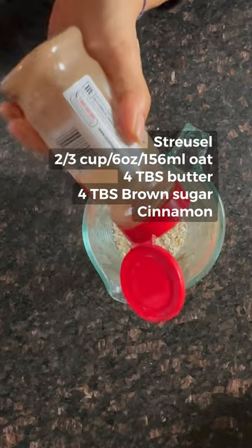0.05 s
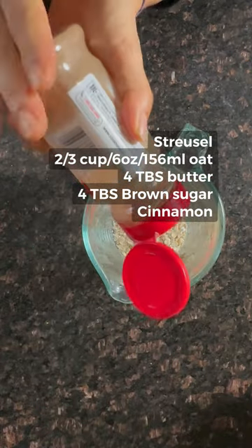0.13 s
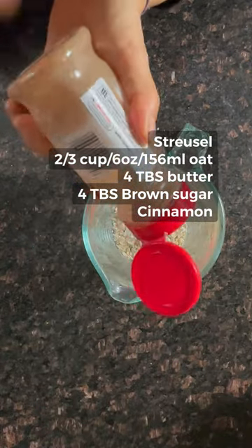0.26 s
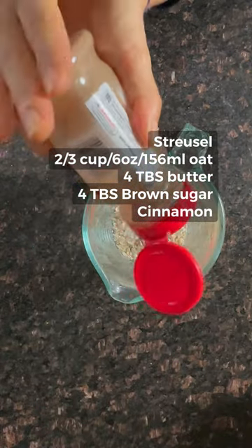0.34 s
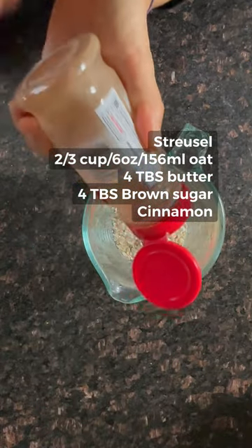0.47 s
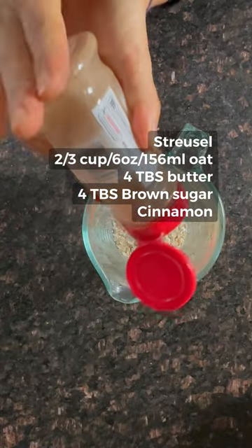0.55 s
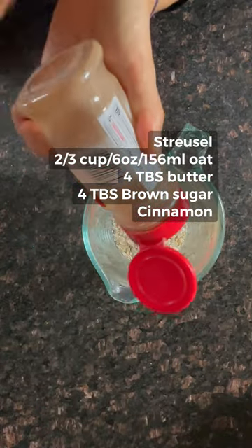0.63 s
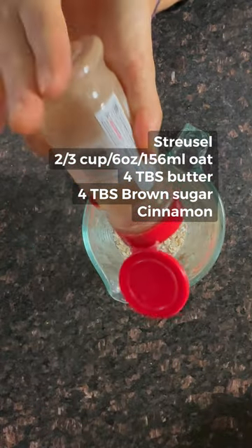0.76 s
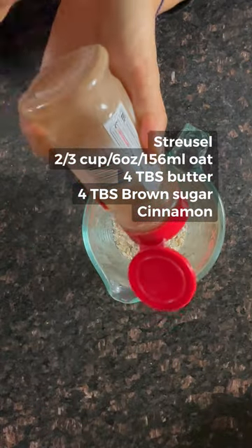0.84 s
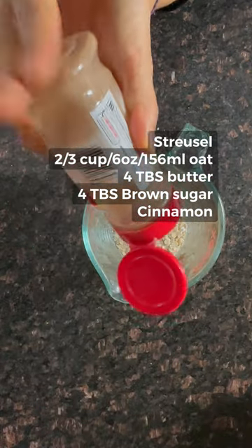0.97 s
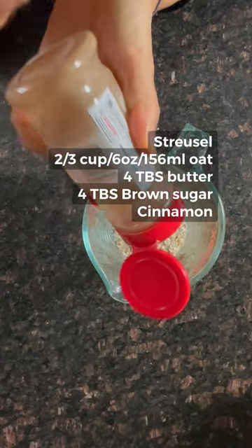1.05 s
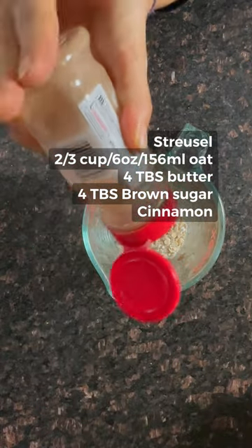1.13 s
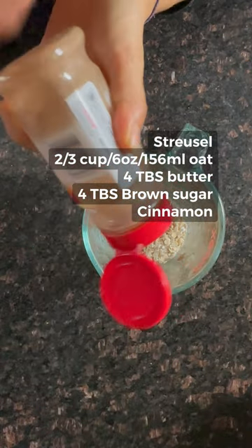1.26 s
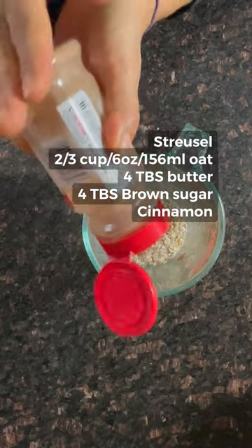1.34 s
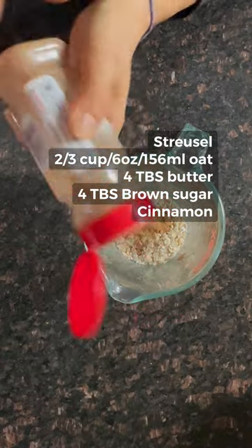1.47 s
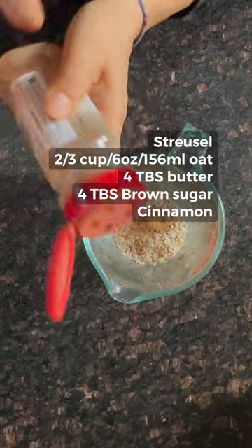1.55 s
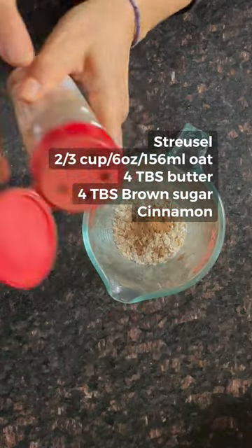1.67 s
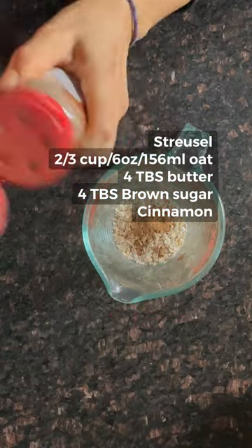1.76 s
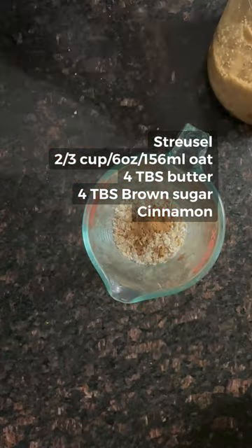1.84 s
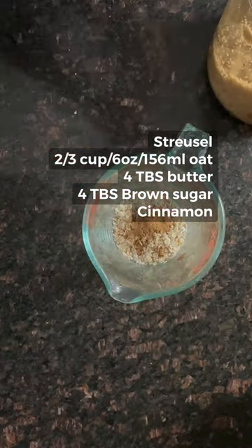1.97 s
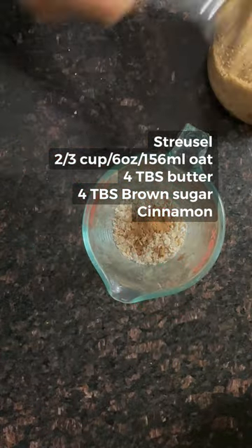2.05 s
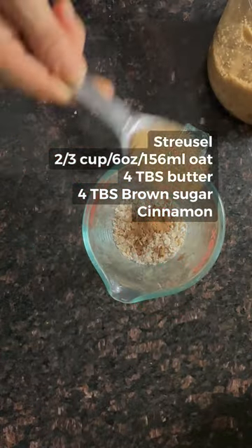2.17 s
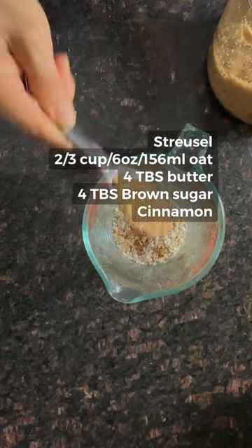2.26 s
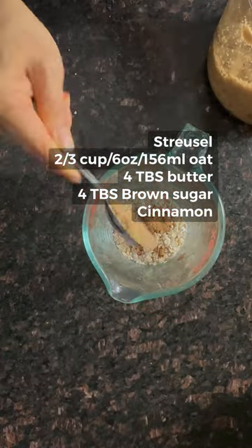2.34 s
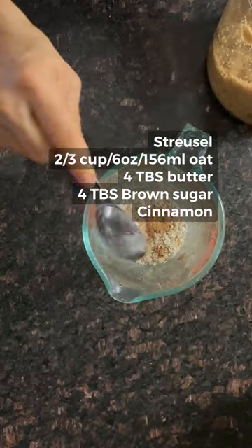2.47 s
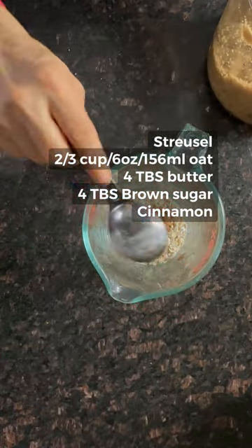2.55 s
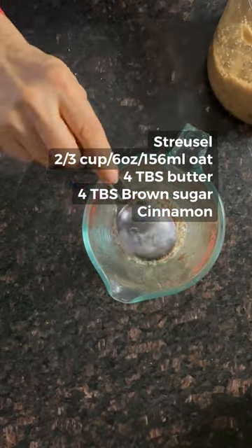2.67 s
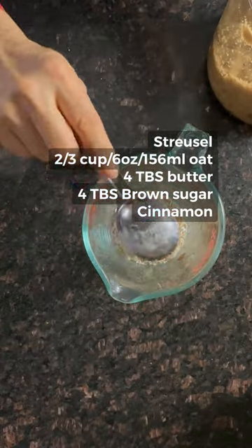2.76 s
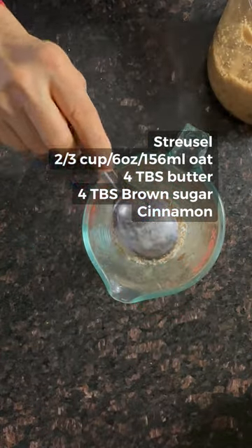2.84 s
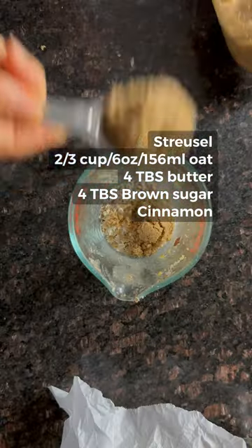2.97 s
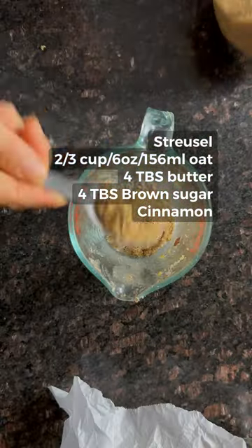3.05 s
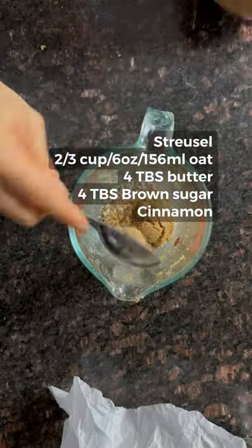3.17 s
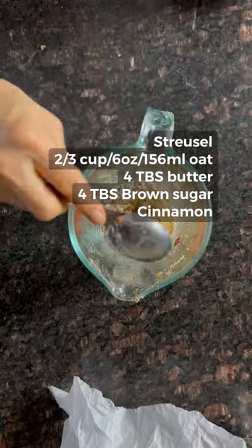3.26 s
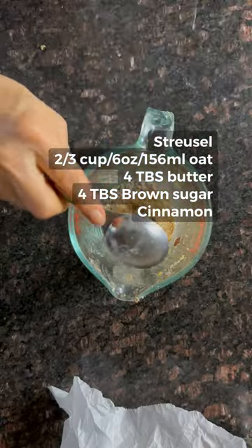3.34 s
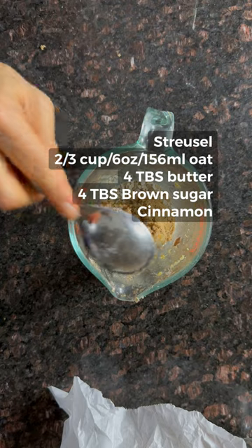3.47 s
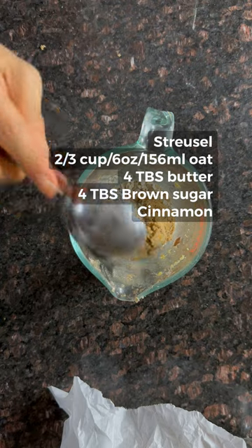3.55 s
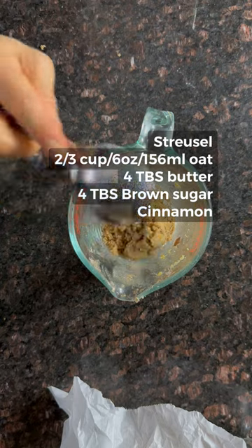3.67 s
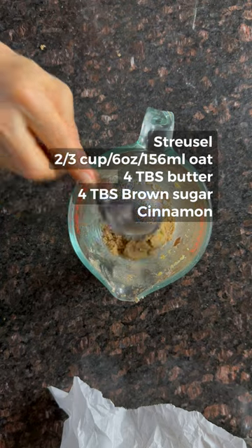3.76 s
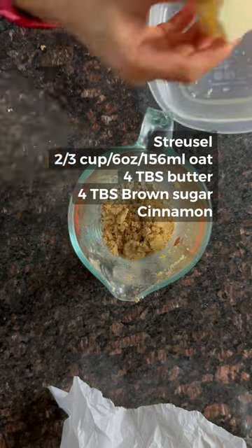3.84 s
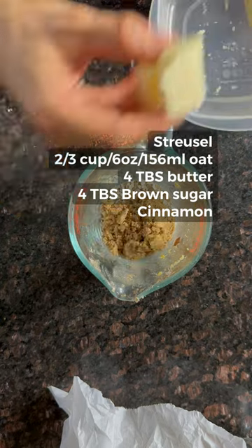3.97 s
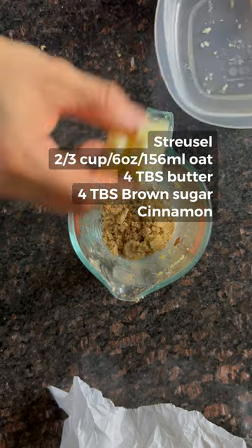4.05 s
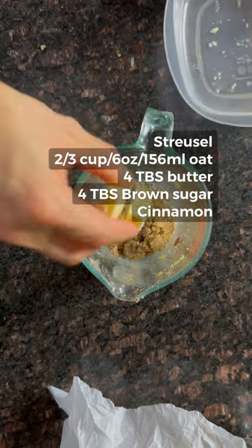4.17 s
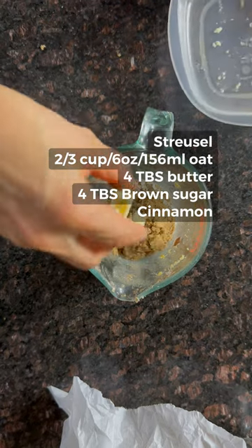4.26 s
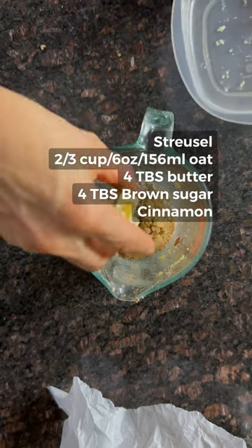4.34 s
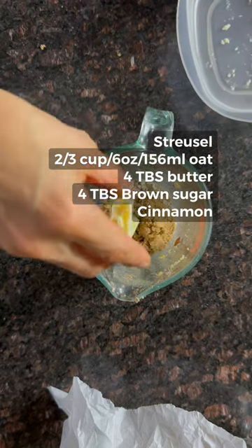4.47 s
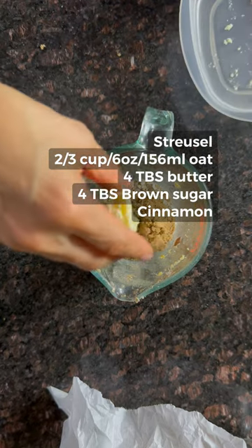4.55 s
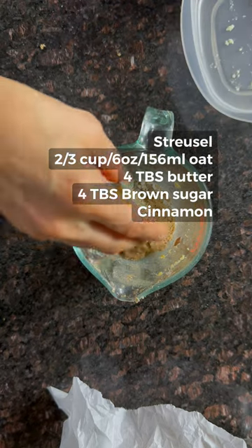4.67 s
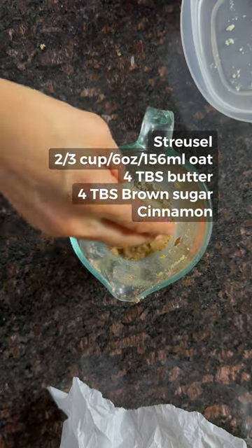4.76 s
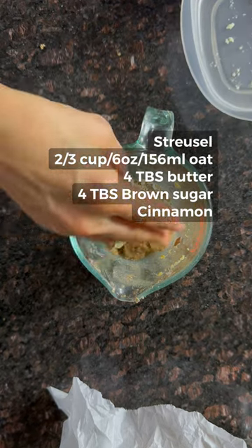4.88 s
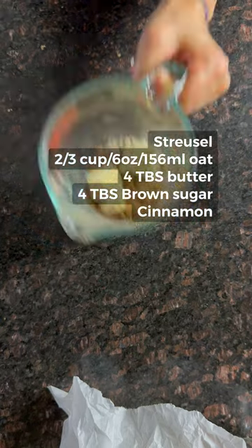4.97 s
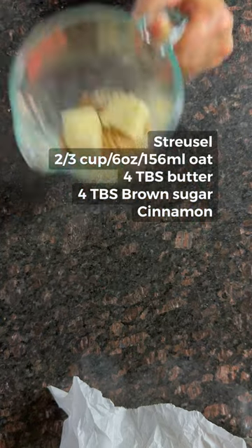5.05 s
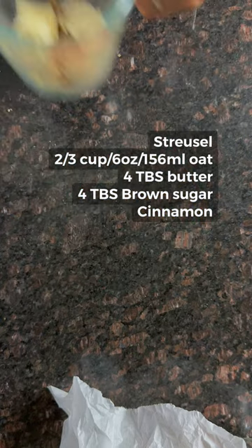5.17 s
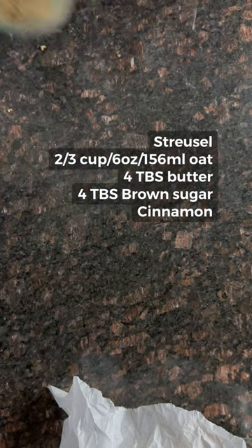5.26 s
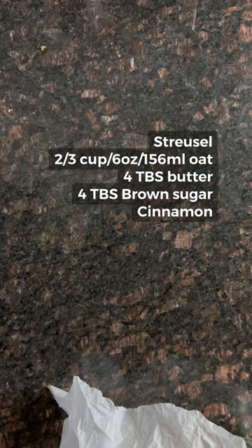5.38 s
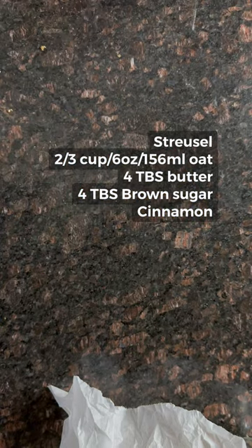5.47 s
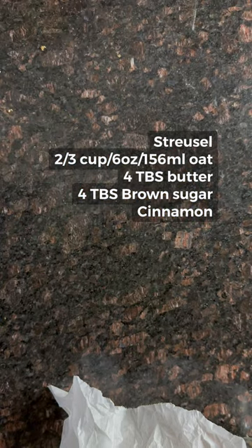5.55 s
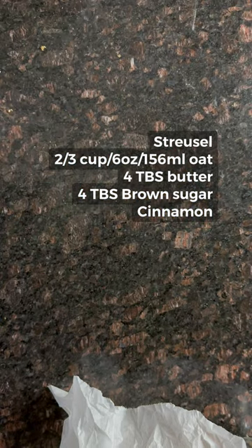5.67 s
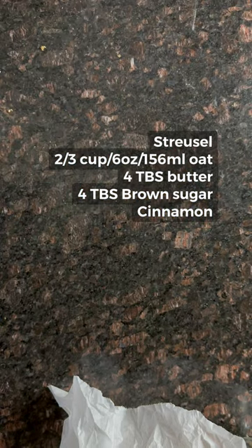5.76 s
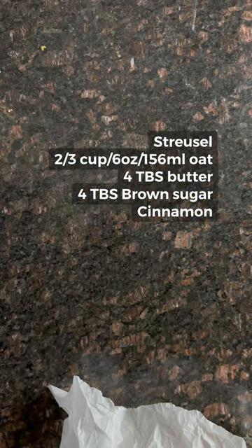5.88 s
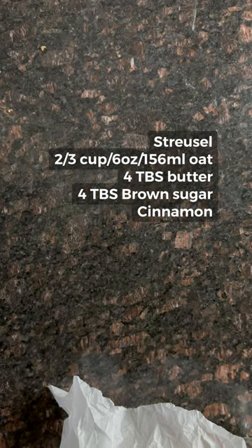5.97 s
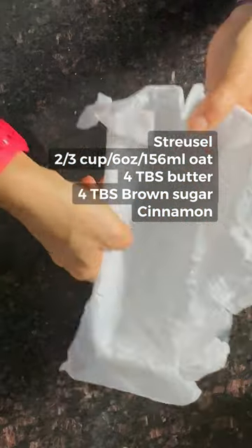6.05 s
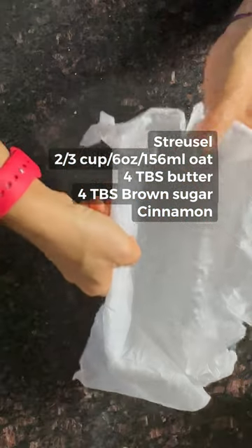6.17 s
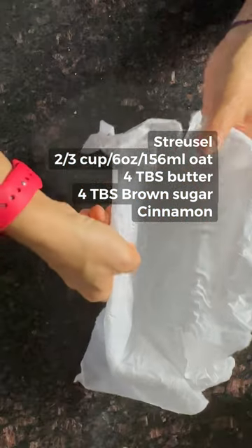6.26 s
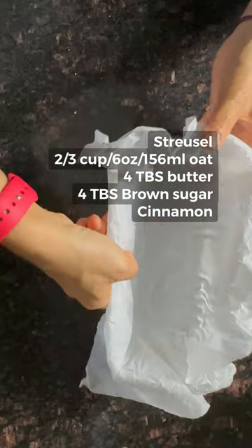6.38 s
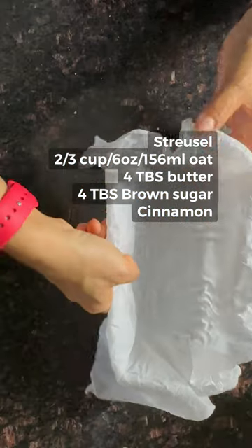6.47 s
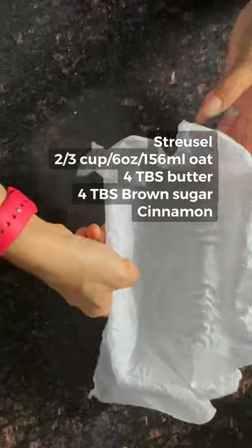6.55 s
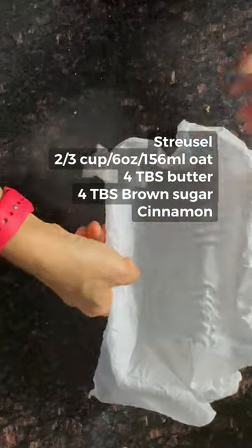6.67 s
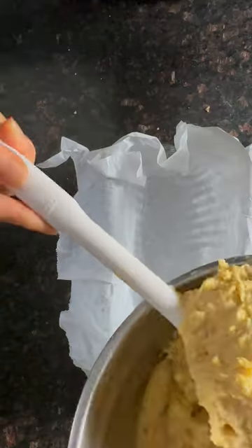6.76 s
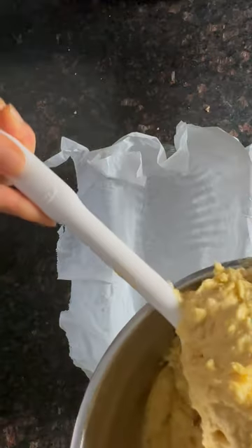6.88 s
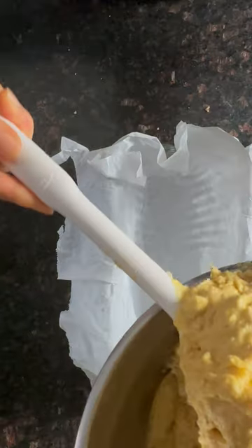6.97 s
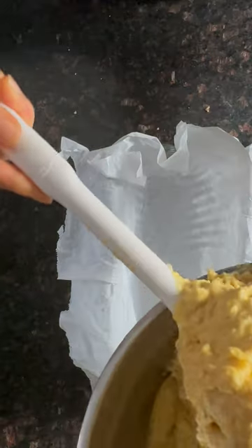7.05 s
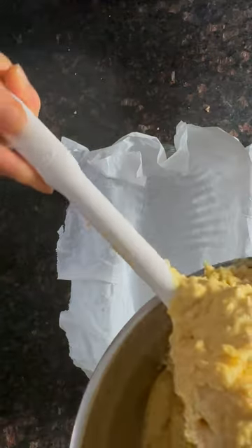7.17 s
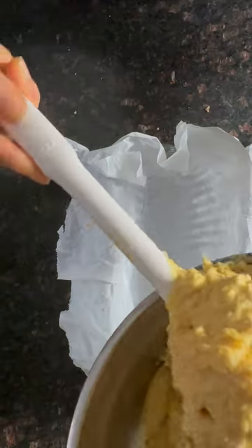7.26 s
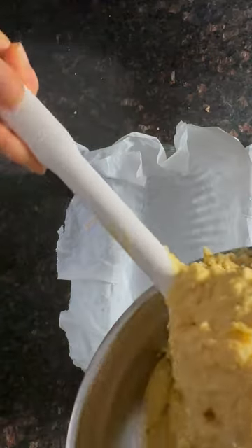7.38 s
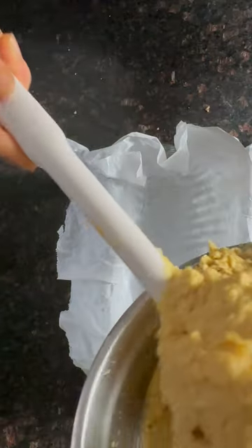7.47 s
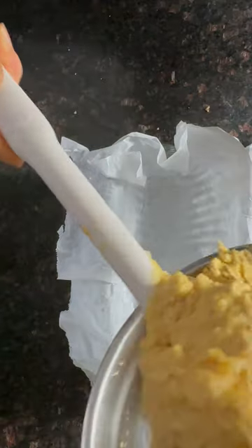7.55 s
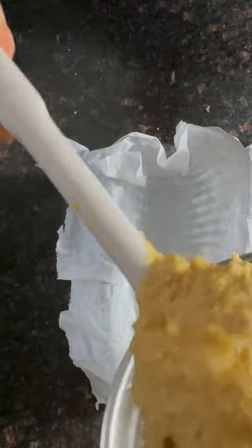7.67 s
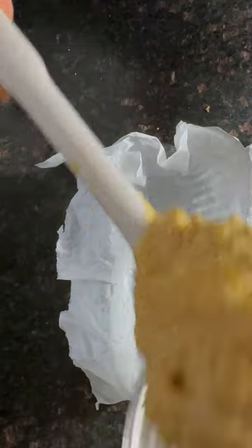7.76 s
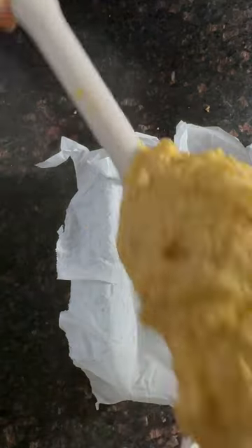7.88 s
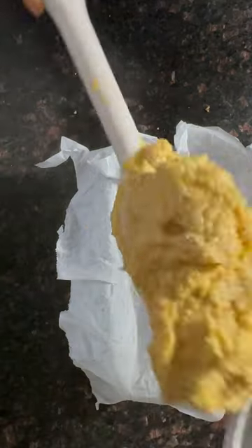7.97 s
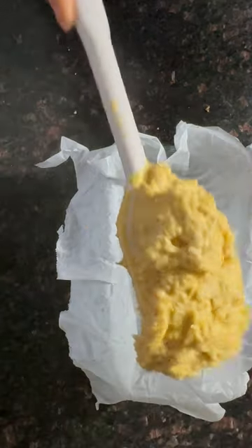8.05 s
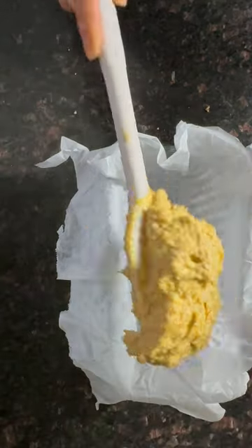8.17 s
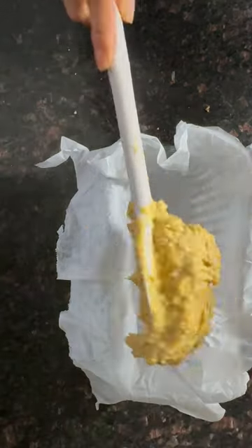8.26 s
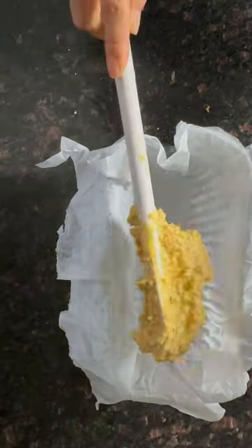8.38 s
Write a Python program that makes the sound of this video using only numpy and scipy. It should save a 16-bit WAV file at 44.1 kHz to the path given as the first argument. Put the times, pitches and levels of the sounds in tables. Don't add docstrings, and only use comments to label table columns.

```python
import sys
import numpy as np
from scipy import signal
from scipy.fft import rfft, irfft, next_fast_len
from scipy.io import wavfile
from scipy.ndimage import map_coordinates

SR = 44100
rng = np.random.default_rng(int(sys.argv[2]) if len(sys.argv) > 2 else 0)


def wrap_up_sound(samples):
    columns = np.atleast_2d(samples).T
    tamed = np.clip(columns, -1, 1)
    steps = np.round(tamed * 32767).astype(np.int16)
    wavfile.write(sys.argv[1], SR, steps)


def invert_db(level):
    return 10 ** (np.asarray(level, dtype=float) / 20)


N = 371322
T = np.arange(SR // 2) / SR


def unit(x):
    return x / np.sqrt(np.mean(x ** 2) + 1e-20)


def along(points, hz):
    f, v = np.transpose(points)
    return np.interp(np.log(hz + 1), np.log(f + 1), v)


def curves(rows):
    s, *cols = np.transpose(rows)
    return [np.interp(np.arange(N) / SR, s, c, left=-150, right=-150) for c in cols]


def wobble(rate):
    knots = rng.standard_normal(int(N * rate / SR) + 4)
    return map_coordinates(knots, [np.arange(N) * rate / SR])


# (frequency [Hz], likeness [0-1])
ALIKE = [(100, .9995), (340, .985), (700, .9), (1700, .65), (2800, .2), (4800, .1), (5900, .96),
         (7000, .97), (8600, .85), (10200, .9), (11000, .999), (14200, .999), (15200, .85)]


def spread(hz):
    return np.arccos(np.clip(along(ALIKE, hz), -1, 1)) / 2


def noise(spectrum, size, tilt_db=0):
    m = next_fast_len(size)
    hz = np.fft.rfftfreq(m, 1 / SR)
    colour = invert_db(along(spectrum, hz) + tilt_db * np.log2((hz + 1) / 1000))
    shares = [np.cos(spread(hz)), np.sin(spread(hz))]
    mid, side = irfft(rfft(rng.standard_normal((2, m))) * colour * shares, m)[:, :size]
    return unit(np.array([mid + side, mid - side]))


def dying(t60, attack, t=T):
    return invert_db(-60 * t / np.maximum(t60, .002)) * (1 - np.exp(-t / attack))


def ring(modes, scatter_db, attack, tilt_db=0, rough=0):
    out = np.zeros((2, len(T)))
    for hz, db, t60 in modes:
        level, turn = rng.standard_normal(2)
        t = T[:int(1.5 * max(t60, .002) * SR)]
        shake = rough * np.interp(t, np.arange(0, .51, .004), rng.standard_normal(128))
        apart = .6 * np.sign(turn) * spread(hz) * np.array([[1], [-1]])
        wave = np.sin(2 * np.pi * hz * t + shake + apart)
        strength = invert_db(db + tilt_db * np.log2(hz / 700) + scatter_db * level)
        out[:, :len(t)] += strength * wave * dying(t60, attack, t)
    return out


CUTS = [
    0,
    3.8225,
    4.977,
    6.03,
    6.72,
    8.43,
]


def next_cut(sample):
    return min(min(round(c * SR) for c in CUTS if round(c * SR) > sample), N)


def add(track, s, sound, pan_db=0):
    start = round(s * SR)
    end = min(start + sound.shape[-1], next_cut(start))
    panned = sound * invert_db([[pan_db / 2], [-pan_db / 2]])
    track[:, start:end] += panned[:, :end - start]


# (frequency [Hz], rms level [dB], unsteadiness [0-1])
HUM = [
    (119.76, -40, 0.13),
    (51.5, -51, 0),
    (217, -62.5, 0.55),
]
# (frequency [Hz], density [dB per Hz])
AIR = [(12, -50.5), (20, -24), (71, -7.5), (110, -8), (147, -8), (174, -15), (273, -24), (361, -30),
       (500, -30), (1050, -38.5), (2500, -46), (5070, -60.5), (9670, -64), (13500, -68), (15700, -74),
       (16200, -100)]
AIR_DB = -47


def fridge():
    t = np.arange(N) / SR
    tones = 0
    for hz, db, loose in HUM:
        swell = 1 + loose * wobble(14)
        tones = tones + np.sqrt(2) * invert_db(db) * swell * np.sin(2 * np.pi * hz * t + 1.6 * loose * wobble(9))
    return tones + invert_db(AIR_DB + 0.63 * wobble(1.9)) * noise(AIR, N)


# (peak time [s], fall [s],
# level [dB], dull part [dB])
RUBS = [(.006, .12, -68, 16), (1.5, .3, -73, -12), (1.675, .15, -56, -1), (2.07, .05, -60, -18),
        (2.152, .025, -67, -15), (2.56, .1, -69, -9), (2.612, .07, -54, -5), (3.0, .02, -64, 5),
        (3.135, .06, -64, 10), (3.265, .1, -67, 2), (3.31, .08, -63.5, 0), (3.45, .5, -77, 9),
        (3.71, .1, -71, 7), (3.754, .015, -50, 5), (3.97, .2, -75, 4), (4.268, .022, -58, -2),
        (4.896, .09, -64, 2),
        (4.99, .11, -57, -4), (5.125, .11, -62, -7), (5.27, .2, -65.5, -8), (5.354, .05, -64.5, -9),
        (5.49, .08, -69, 0), (5.62, .2, -66, -2), (5.77, .2, -68, -2), (5.88, .15, -64, -3),
        (6.048, .05, -57, 12), (6.084, .06, -56, 8), (6.16, .1, -61, 3), (6.722, .06, -68, 6),
        (6.894, .03, -58.5, -4), (6.945, .09, -65, -1), (7.125, .3, -62.5, 0), (7.319, .05, -63, -10),
        (7.39, .25, -67, -8), (7.54, .12, -67, -4), (7.6, .12, -65, 4), (7.8, .4, -73, 4),
        (8.05, .25, -68.5, 3), (8.36, .12, -69, -3)]
# (start time [s], end time [s], level [dB])
BEDS = [
    (3.0, 3.8225, -65),
    (0, 1.3, -70),
    (4.3, 4.977, -72),
]
STROKE_DB = 18
RISE_SHARE = .3


def strokes(rows):
    t, power = np.arange(N) / SR, np.zeros((2, N))
    for s, fall, db, dull_db in rows:
        shot_start = max(c for c in CUTS if c <= s)
        a = int(max(s - .3, shot_start) * SR)
        b = min(int((s + .6) * SR), next_cut(int(s * SR)))
        after = (t[a:b] - s) / max(fall, .005)
        before = (s - t[a:b]) / max(RISE_SHARE * fall, .003)
        away = np.maximum(after, before)
        power[:, a:b] += invert_db(db - STROKE_DB * away + np.array([[0], [dull_db]])) ** 2
    for start, end, db in BEDS:
        power[1, int(start * SR):int(end * SR)] += invert_db(db) ** 2
    return np.sqrt(power)


# (frequency [Hz], density [dB per Hz])
CRISP = [(1900, -15), (3500, 2), (4810, -2.5), (5810, 0.5), (8190, 0), (10600, 0.5), (13000, -6),
         (15500, -3), (16200, -41.5)]
# (frequency [Hz], density [dB per Hz])
DULL = [(180, -50), (300, -20), (729, 0.5), (977, 1.5), (1370, -5), (3800, -12), (4810, -37.5),
        (5500, -22.5), (7150, -50.5), (12100, -120)]


def rustle(crisp, dull, grain_db):
    grains = invert_db(grain_db * wobble(450) + 2.2 * wobble(60))
    bright = unit(grains * noise(CRISP, N))
    soft = unit(np.sqrt(grains) * noise(DULL, N))
    return crisp * bright + dull * soft


# (time [s], peak level [dB], slap [dB], lid [dB], left over right [dB])
TAPS = [
    (0.091, -36.5, -6, -36, -11),
    (0.292, -10.5, -20, -32, -1),
    (0.5025, -6.5, -19, -27, -1.5),
    (0.698, -5.5, -19, -33, -1.5),
    (0.8955, -7, -19, -22, -1.5),
    (1.0875, -22.5, -7, -13, 1.5),
    (1.28, -32, -8, -25, 0),
]
# (answer delay [s], pitch factor [ratio], rebound level [dB])
GRIPS = [
    (.001, 0.62, -1),
    (.0017, 1.02, -2),
    (.0013, 0.98, -1),
    (.0017, 1.03, -3),
    (.001, 1.03, -2.5),
    (.001, 1.02, -2),
    (.001, 1.03, -2),
]
# (frequency [Hz], level [dB], t60 [s])
BLOW = [(790, -4.5, .2), (520, -15, .2)]
# (frequency [Hz], level [dB], t60 [s])
JAR = [(430, -10, 0.03), (590, -5, .025), (703, 3, 0.021), (840, 1.5, 0.021)]
# (frequency [Hz], density [dB per Hz])
SLAP = [(710, -38), (1200, -41), (1670, -4), (3400, 0), (4600, -5), (5700, -5), (8000, -6), (11100, -4),
        (15600, -15), (16500, -41)]
# (frequency [Hz], density [dB per Hz])
HOLLOW = [(150, -41), (250, -10), (313, -13), (420, -7), (750, -4.5), (990, -3), (1190, -20), (1360, -19.5),
          (1920, -34), (3610, -27), (9000, -41), (11700, -57), (19800, -120)]
SWELL_S, SWELL_WIDTH_S, REBOUND_S = .0025, .00175, .0056
THUD_DB, THUD_GROWS = -24, .35


def jar():
    out = np.zeros((2, N))
    lid = [(3400, -1, .03), (3340, -20, .28), (3560, -26, .2)]  # (Hz, dB, t60 s)
    for (s, db, slap_db, lid_db, pan_db), (lag, pitch, rebound_db) in zip(TAPS, GRIPS):
        skin = dying(0.027, 0.00031) + invert_db(-21) * dying(0.3, .003)
        slap = invert_db(db + slap_db - 2.2) * noise(SLAP, len(T)) * skin
        pushed = ring([(pitch * hz, v, t60) for hz, v, t60 in BLOW], 0.78, 0.0024)
        body = invert_db(db + 0.2) * pushed * np.exp(-((T - SWELL_S) / SWELL_WIDTH_S) ** 2)
        back = invert_db(db) * ring([(pitch * hz, v, t60) for hz, v, t60 in JAR], 0.78, 0.0024)
        thud = invert_db(THUD_DB + THUD_GROWS * db) * ring([(220, 0, 0.072)], 0, 0.0022)
        add(out, s - .008, invert_db(-24.5) * (slap + body), pan_db)
        add(out, s, slap + thud)
        add(out, s, invert_db(db + lid_db) * ring(lid, 0, 0.00078, rough=2.6), pan_db)
        add(out, s + lag, body, pan_db)
        add(out, s + lag + REBOUND_S, invert_db(rebound_db) * back, pan_db)
        add(out, s + 0.0087, invert_db(db - 31) * noise(HOLLOW, len(T)) * dying(0.35, 0.0013))
    return out


# (time [s], frequency [Hz], level [dB],
# t60 [s])
PUSHES = [(.092, 438, -31, 0.032), (3.766, 75.4, -27, 0.17), (3.765, 186, -32, 0.1),
          (6.142, 166, -23, 0.073), (6.276, 80, -19.5, 0.089), (6.275, 206.5, -16.5, .06),
          (3.145, 220, -37, 0.17), (4.67, 952, -52.5, 0.47), (4.8, 960, -61, .5), (4.7, 1757, -60, 0.57),
          (6.37, 3297, -40, 0.11), (6.459, 70.4, -26, 0.078),
          (1.68, 1700, -57, .15),
    (2.605, 5450, -53, .06),
    (6.05, 950, -43, .08),
    (7.59, 3300, -60, .16),
    (7.12, 2900, -64, .3),
    (6.412, 3300, -23.5, .03),
]


def counter():
    out = np.zeros((2, N))
    for s, hz, db, t60 in PUSHES:
        add(out, s, ring([(hz, db + 7, t60)], 0, t60 / 8, rough=min(hz / 1000, 4)))
    return out


# (time [s], peak level [dB], dull part [dB])
TICKS = [(1.8143, -50.5, -2), (2.3554, -60, -12), (2.5955, -49, -32), (2.9976, -43, 6), (3.299, -52, 3),
         (4.2667, -56, -8), (4.8924, -58, 4), (4.9761, -48, -7), (5.1203, -53, -9), (5.3038, -50, -18),
         (5.3477, -56, -14), (5.456, -53, -4), (5.8401, -56, -16), (6.8937, -43, -17), (7.2988, -48, -19),
         (7.3118, -42, -28), (7.4041, -52, -11), (7.5294, -52, -22.5), (8.2751, -52.5, -11),
         (8.3639, -53, -11)]
# (time [s], peak level [dB], dull part [dB], flap pitch [Hz])
SNAPS = [(6.0432, -42, -9, 5650), (6.0484, -36.5, 2, 2250), (6.0761, -37, 1.5, 4200),
         (6.1669, -37, -12.5, 8590), (6.1873, -32, -13, 2040), (6.2234, -38, 2.5, 2320),
         (6.2625, -36, 8, 1900), (6.2901, -15, -13, 8400), (6.2955, -24, -6, 7400), (6.3105, -30, 8, 1900),
         (6.4123, -17, 0, 2700), (6.4155, -25, -4, 7800), (6.4195, -25, 6, 3000), (6.4245, -29, 3, 2600),
         (6.4484, -31, 14, 2020), (6.452, -30, 13, 3500), (6.5035, -30, 12, 2900), (6.5205, -33, 8, 5000),
         (6.541, -22.5, -14, 5800), (6.5515, -28, -3, 8000), (6.5575, -26, 0, 6100), (6.5645, -31, 6, 7500),
         (6.5914, -22.5, -15, 8600), (6.5965, -30, -6, 6200), (6.6348, -29, 6, 900),
         (6.6505, -36, -5, 9000), (6.6635, -34, -3, 6500), (6.6845, -38, -5, 7000), (6.6907, -24, -6, 5300),
         (6.697, -33, -3, 3300), (6.7045, -31, 0, 6000), (6.7094, -34, 1.5, 2880)]
TICK_T60, SNAP_T60 = .012, .022
CRISP_FLAP_HZ, DULL_FLAP_HZ = 7000, 2800


def snaps():
    out, size = np.zeros((2, N)), SR // 10
    creases = []
    for s, db, dull_db in TICKS:
        flap_hz = CRISP_FLAP_HZ if dull_db < -8.5 else DULL_FLAP_HZ
        creases.append((s, db, dull_db, flap_hz, TICK_T60))
    creases += [(*row, SNAP_T60) for row in SNAPS]
    for s, db, dull_db, hz, t60 in creases:
        burst = noise(CRISP, size) + invert_db(dull_db) * noise(DULL, size)
        flap = ring([(hz, -2, 0.55 * t60)], 0, .0004, rough=3.5)[:, :size]
        pan_db = 3 * rng.standard_normal()
        add(out, s, invert_db(db - 6) * (burst * dying(t60, .0004)[:size] + flap), pan_db)
    return out


# (time [s], peak level [dB], crumble [dB], crumble tilt [dB per octave], left over right [dB])
SPOON = [
    (3.1395, -34, -2, 0, 0),
    (3.143, -28.5, -1, -1, 0.5),
    (3.154, -30, -2.5, -3, -5.5),
    (3.759, -12, -4, 1.5, 0),
    (3.7625, -20, -6, 0, -2),
    (3.768, -18, -7, -3, -2.5),
    (3.778, -25, -9, -5, -3),
    (3.781, -22, -10, -6.5, -4),
    (3.7845, -24, -10, -5, -3),
    (3.794, -25.5, -8.5, -4, -2.5),
]
# (frequency [Hz], level [dB], t60 [s])
JUG = [(436, -4, 0.12), (958, -9, .1), (1077, -9, .1), (1658, -11, .1), (1873, -9, .045), (2261, -10, 0.1),
       (3435, -19, .15), (5669, -4, 0.07), (3682, -12, 0.09), (4802, -19, .09), (6605, -21, 0.25),
       (6918, -20, .2), (8468, -16, 0.09), (9950, -19, .18)]
# (frequency [Hz], level [dB], t60 [s])
RIM = [(732, 3.5, 0.029), (620, -11, 0.06), (947, -8, .06), (1160, -13, .05), (1444, -4.5, 0.036),
       (1780, -12, 0.06), (2080, -4.5, 0.022), (3270, -22, .06), (6840, -26, .15), (7310, -14.5, 0.11),
       (9960, -14, 0.1)]
# (frequency [Hz], density [dB per Hz])
CRUMBLE = [(88, -12), (400, -16), (760, -2.5), (1360, -17), (1790, -13.5), (3930, -23), (7370, -25),
           (10700, -21), (15600, -32), (16300, -56)]
CRUMBLE_T60, CRUMBLE_T60_PER_DB = .045, .0038


def spoon():
    out = np.zeros((2, N))
    for s, db, crumble_db, tilt_db, pan_db in SPOON:
        fall = dying(CRUMBLE_T60 - CRUMBLE_T60_PER_DB * db, .001)
        crumbs = invert_db(crumble_db) * noise(CRUMBLE, len(T), tilt_db) * fall
        glass = ring(JUG if s < 3.5 else RIM, 1.7, 0.001, rough=1.0)
        add(out, s, invert_db(db - 6) * (crumbs + glass), pan_db)
    return out


# (time [s], level [dB])
CHAIN = [
    (3.305, -62),
    (3.69, -74),
    (6.095, -50),
    (6.12, -55),
    (7.435, -71),
    (7.91, -58),
    (7.935, -62),
]
# (frequency [Hz], level [dB], t60 [s])
LINKS = [(7784, -3, 0.2), (9464, 2.5, .15), (11100, -3, .1)]


def chain():
    out = np.zeros((2, N))
    for s, db in CHAIN:
        add(out, s, invert_db(db) * ring(LINKS, 1.5, 0.0052, rough=.9))
    return out


# (time [s], firing rate [Hz], load level [dB])
ENGINE = [
    (4.2, 136.6, -59),
    (4.344, 145.2, -53.5),
    (4.68, 176.4, -52),
    (4.808, 174.4, -39),
    (4.876, 189.5, -45),
    (4.97, 198.8, -40),
]
# (multiple [ratio], level [dB])
ORDERS = [(2, -2.5), (3, 1.5), (5, -9)]
UPPER_DB, ROAR_DB = -61, -63.5
ROAR_DB_PER_HZ = .2


def engine():
    hz, load_db = curves(ENGINE)
    turn = 2 * np.pi * np.cumsum(hz * (1 + 0.036 * wobble(40))) / SR
    upper = sum(invert_db(db - 6 + 3.7 * wobble(25)) * np.sin(order * turn) for order, db in ORDERS)
    roar_colour = DULL[:5] + [(2600, -7), (9000, -58)]
    roar = invert_db(ROAR_DB + ROAR_DB_PER_HZ * (hz - 180)) * noise(roar_colour, N)
    orders = invert_db(load_db) * np.sin(turn) + (hz > 0) * invert_db(UPPER_DB) * upper
    return np.sqrt(2) * orders + roar


# (time [s], pressure [dB], crispness [dB])
PAPER = [
    (6.165, -57, -7),
    (6.229, -44.5, 1),
    (6.347, -49, 3),
    (6.485, -41, -12),
    (6.565, -40.5, -8),
    (6.677, -46, -10),
    (6.72, -48, -8),
]


def lining():
    press_db, crisp_db = curves(PAPER)
    return rustle(invert_db(press_db + crisp_db), invert_db(press_db), grain_db=3.6)


# (time [s], peak level [dB], brightness [dB per octave], rattle [dB], left over right [dB])
KNOCKS = [
    (6.261, -24, 3.5, -15.5, -6.5),
    (6.27, 3.5, -2.5, -2.5, -1.5),
    (6.277, -14, 1, -2.5, -11.5),
    (6.2815, -7, -7.5, -13.5, 2),
    (6.456, -5, 5, 2, -0.5),
    (6.46, -9, -0.5, -18, 4.5),
    (6.464, -17, 2, -10, 0),
    (6.471, -10, 2.5, -10.5, 6.5),
    (6.5025, -15, -4, -10, 0),
    (6.48, -11.5, -5, 2.5, -4),
]
# (frequency [Hz], level [dB], t60 [s])
TIN = [(211.3, -14, 0.035), (503, -10, 0.055), (617, -8, 0.046), (685, 6, 0.042), (789, 2.5, 0.0367),
       (1070, -10, 0.027), (1250, 0, 0.042), (1495, -2.5, .03), (1770, -1.5, 0.023), (2006, 5.5, 0.019),
       (2852, -11.5, 0.0977), (3644, -10, 0.051), (4330, -15, 0.072), (6390, -22.5, 0.048)]
# (frequency [Hz], density [dB per Hz])
RATTLE = [(45, -40), (110, -10), (432, -6.5), (615, -5.5), (1000, -8.5), (1990, -6.5), (2280, -6.5),
          (3710, -20.5), (9200, -31.5), (10500, -50.5), (12000, -114), (15600, -144), (22000, -120)]
RATTLE_T60, SETTLE_T60 = .06, .15


def tin():
    out = np.zeros((2, N))
    for s, db, tilt_db, rattle_db, pan_db in KNOCKS:
        t60 = SETTLE_T60 if s == KNOCKS[-1][0] else RATTLE_T60
        contact_hz = 2400 if s < 6.4 else 9000

        def soft_db(hz):
            return -10 * np.log10(1 + (hz / contact_hz) ** 6)

        rattle = [(hz, v + soft_db(hz)) for hz, v in RATTLE]
        modes = [(hz, v + soft_db(hz), life) for hz, v, life in TIN]
        loose = invert_db(rattle_db) * noise(rattle, len(T)) * dying(t60, 0.00041)
        sheet = ring(modes, 0.79, .0005, tilt_db, rough=1.1)
        crack = invert_db(rattle_db + 1.5) * noise(rattle, len(T), 2.5) * dying(.008, .0002)
        add(out, s + .001, invert_db(db - 13) * (sheet + loose + crack), pan_db)
    return out


# (frequency [Hz], t60 [s])
WALLS = [(200, 0.12), (800, 0.25), (4000, 0.47), (10000, .25)]


def room(x):
    wet, step, fresh = np.zeros((2, N)), SR // 20, 0
    for start in range(0, N, step):
        stretch = x[:, start:start + step]
        if np.abs(stretch).max() < invert_db(-75):
            continue
        if start >= fresh:
            fresh = start + 4 * step
            hz, t, z = signal.stft(noise([(100, 0)], SR // 2), SR, nperseg=256)
            tail = signal.istft(z * invert_db(-60 * t / along(WALLS, hz)[:, None]), SR, nperseg=256)[1]
            tail = np.pad(tail / np.linalg.norm(tail[0]), ((0, 0), (SR // 150, 0)))
        echo = signal.fftconvolve(stretch, tail, axes=1)[:, :next_cut(start) - start]
        wet[:, start:start + echo.shape[1]] += echo
    return wet


def scene():
    hits = spoon() + tin() + chain() + snaps()
    scattered = hits.mean(axis=0)[None] * unit(wobble(1300))
    steady = fridge() + engine() + rustle(*strokes(RUBS), grain_db=2.0) + lining()
    return steady + jar() + counter() + hits + room(invert_db(-9) * scattered)


def roll_off(x):
    return signal.sosfilt(signal.butter(12, 17150, fs=SR, output="sos"), x)


# (frequency [Hz], lead of the right port [radians])
PORTS = [(300, 0), (1500, -.25), (5900, 0), (7000, .3), (8600, 1.4), (10000, 2.1), (11300, 3.08),
         (12700, np.pi), (14000, 3.25), (15000, 4.1)]


def record(dry):
    m = next_fast_len(N)
    lead = along(PORTS, np.fft.rfftfreq(m, 1 / SR)) / 2
    ports = irfft(rfft(dry, m) * np.exp(1j * np.array([-lead, lead])), m)[:, :N]
    return roll_off(ports)


dry = scene()
out = record(dry)
wrap_up_sound(out)
```